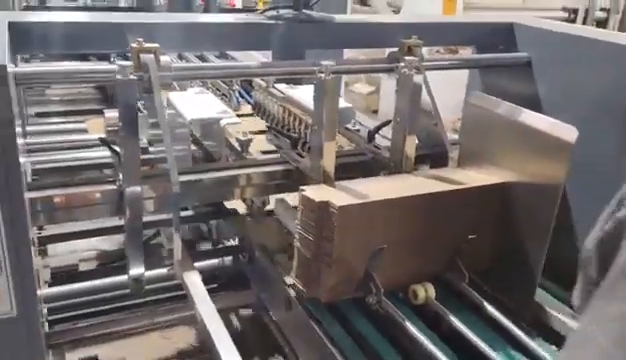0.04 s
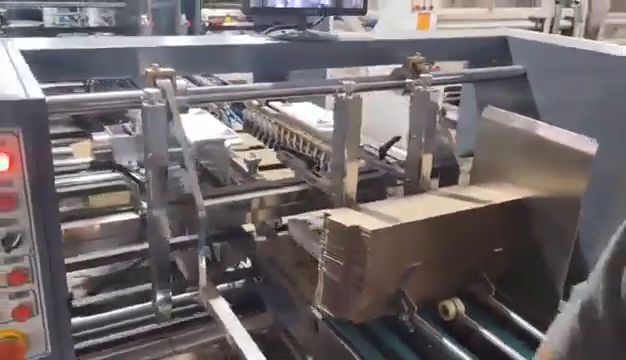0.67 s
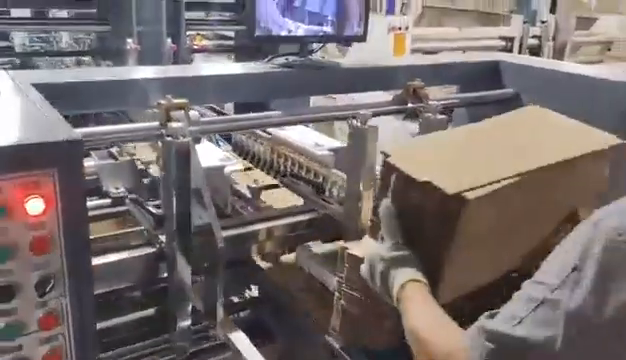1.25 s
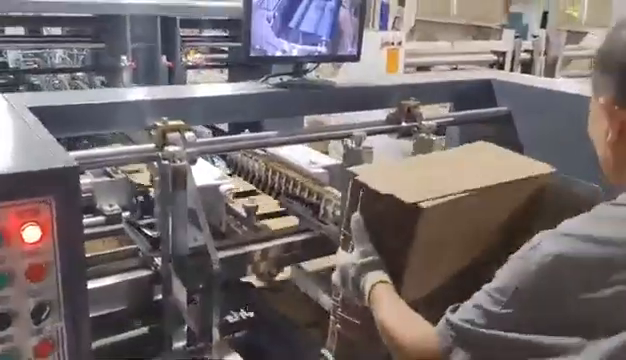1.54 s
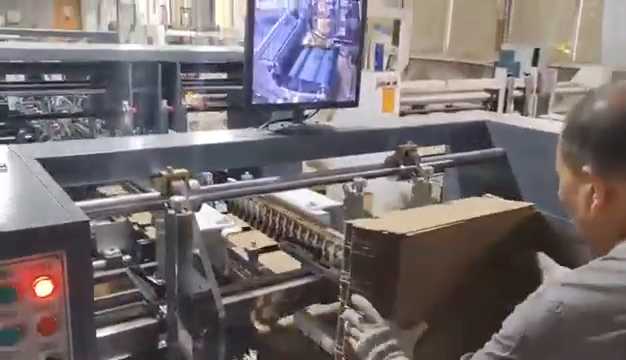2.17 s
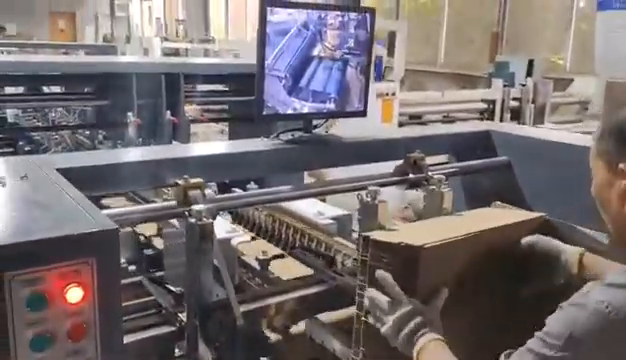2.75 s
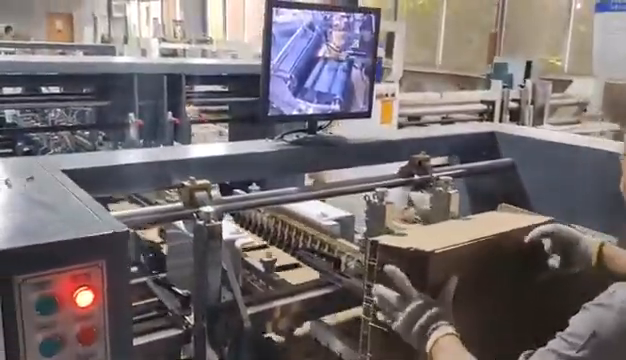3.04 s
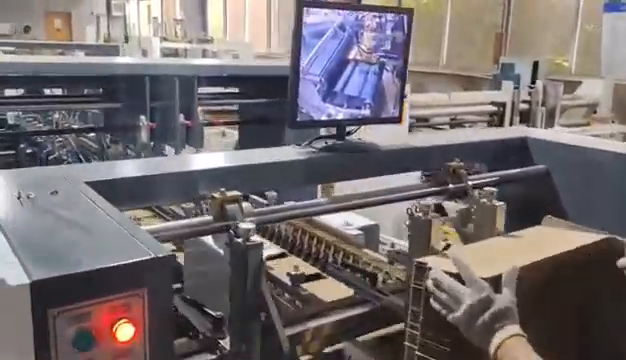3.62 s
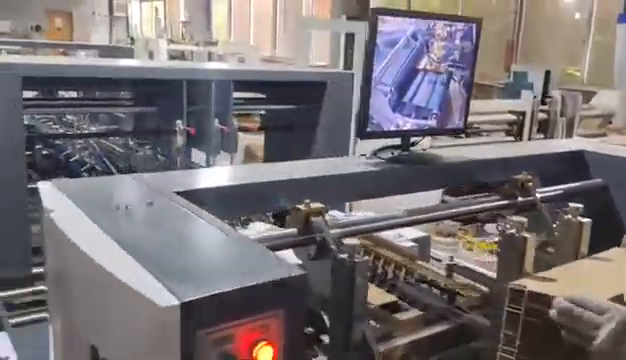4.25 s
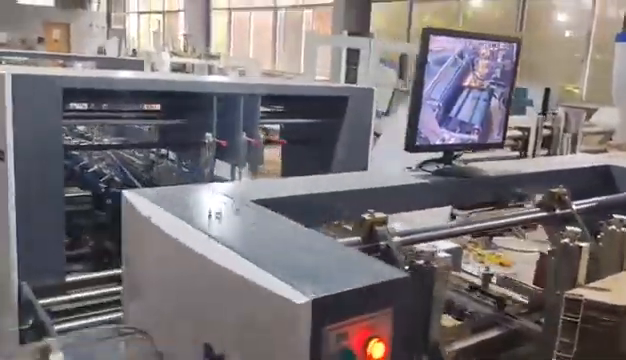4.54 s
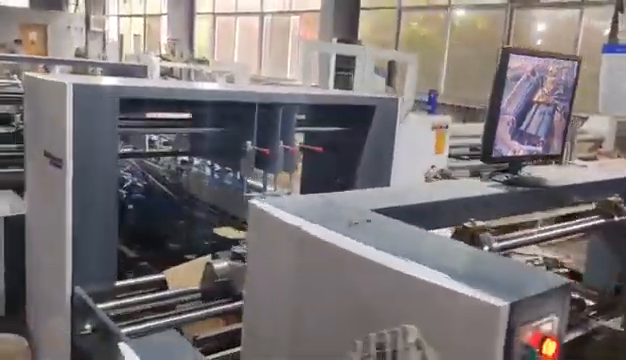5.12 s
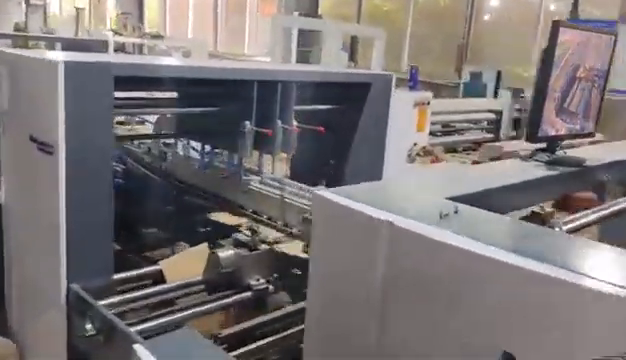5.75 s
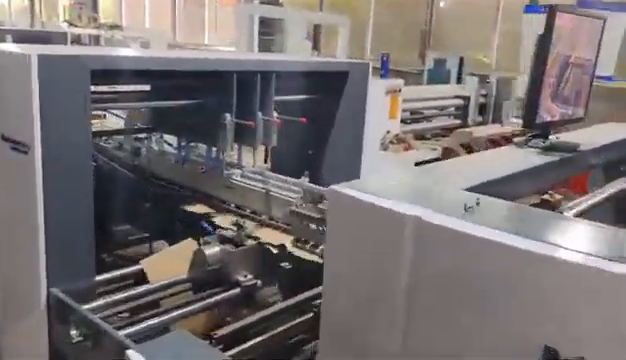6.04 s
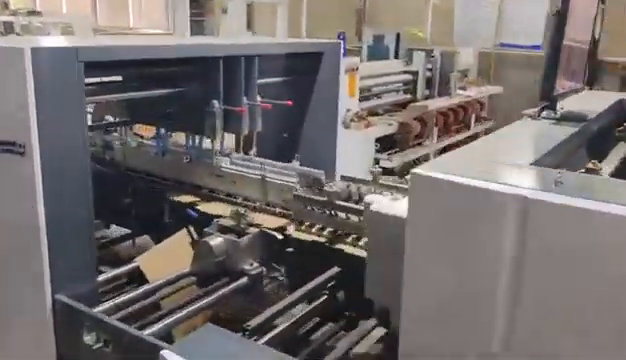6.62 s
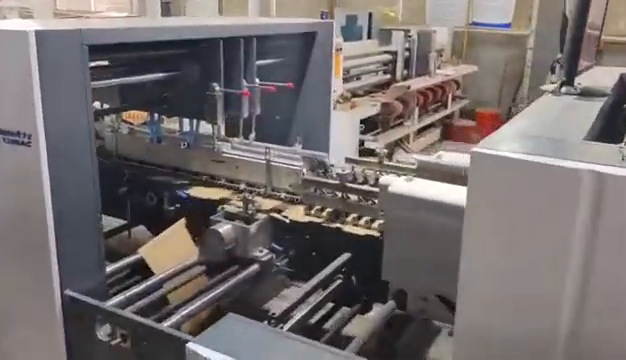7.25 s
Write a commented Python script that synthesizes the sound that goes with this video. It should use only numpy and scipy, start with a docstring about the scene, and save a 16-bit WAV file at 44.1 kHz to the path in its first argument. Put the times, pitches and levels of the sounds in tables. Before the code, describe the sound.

A factory machine feeds cardboard with a rhythmic rasp and clack over a throbbing drone, belt hiss and faint motor whine.

```python
"""A factory hall, one microphone carried from the feeder of a box folding and gluing machine along its frame.
Close by at first, a cardboard blank rasps out from under the stack about five times a second and clacks
into the rollers; card flicks at the gate and squeaks on the guides, with a faint echo off the walls.
Behind it shafts drone and throb through the steel frame, rollers rattle, belts hiss, the drive motor
whines and bearings sing. The rasp and the hiss fall back as the walk goes on."""
import sys
import numpy as np
from scipy import signal
from scipy.fft import rfft, irfft
from scipy.io import wavfile

SR = 44100
rng = np.random.default_rng(int(sys.argv[2]) if len(sys.argv) > 2 else 0)


def dump_mix(stems):
    """Bounce the given channels to the path in sys.argv[1] as a 16-bit WAV at rate SR."""
    frames = np.atleast_2d(stems).T  # one column per channel
    limited = np.clip(frames, -1, 1)  # hard clip at full scale
    pcm = np.round(limited * 32767).astype(np.int16)
    wavfile.write(sys.argv[1], SR, pcm)


N = 321489

# The blanks leaving the feeder. Each row: hit on the rollers in seconds, seconds by which the slide
# peaks earlier, slide length in seconds, relative levels in dB of rasp, edge hiss, snap and knock,
# knock pitch in Hz, relative thump level in dB.
BLANKS = [(0.09, 0.0073, 0.02, -28.5, -36, -28.5, -47, 1150, -21),
          (0.295, 0.038, 0.07, -28, -31.5, -23, -31, 1150, -40),
          (0.486, 0.025, 0.082, -31.5, -32.5, -29.5, -40, 955, -15),
          (0.664, .027, 0.059, -29, -31.5, -26, -29, 1060, -14),
          (0.859, 0.015, 0.038, -31, -36.5, -29, -29.5, 1105, -22),
          (1.065, 0.049, 0.09, -35.5, -42, -32, -34.5, 1180, -22),
          (1.251, 0.034, 0.074, -36, -39, -34, -38, 1040, -31),
          (1.442, 0.018, 0.053, -39, -39, -30.5, -34, 1180, -19),
          (1.641, 0.015, 0.033, -35.5, -39.5, -44, -32, 1040, -18),
          (1.82, 0.036, 0.051, -36, -40, -34.5, -52, 1040, -13.5),
          (2.004, 0.021, 0.046, -33.5, -35.5, -44, -44, 1050, -22),
          (2.186, 0.025, 0.022, -32, -35.5, -37, -34, 1156, -20),
          (2.374, 0.015, 0.043, -42, -42, -31, -33.5, 1035, -24),
          (2.564, 0.011, .035, -36.5, -51, -28.5, -37, 1120, -19),
          (2.752, 0.02, 0.078, -36, -40, -35, -38, 1060, -20),
          (2.937, 0.016, 0.046, -40, -56, -30.5, -36, 1060, -20),
          (3.127, 0.034, 0.047, -31.5, -37.5, -32, -42, 1130, -38),
          (3.319, 0.017, 0.039, -38, -37.5, -31.5, -38, 1080, -40),
          (3.513, 0.0073, 0.036, -35, -42, -34, -38, 1100, -23),
          (3.7, 0.03, 0.05, -37, -39, -40, -34.5, 1140, -25),
          (3.911, 0.02, 0.031, -39, -35, -34, -34, 1230, -17),
          (4.1, 0.021, 0.085, -42, -42, -42, -30.5, 1180, -24),
          (4.29, 0.023, 0.091, -42, -40.5, -33, -30.5, 1180, -17.5),
          (4.478, .012, 0.043, -56, -41, -37, -32, 1150, -32),
          (4.672, 0.009, 0.026, -50, -53, -42, -30, 1010, -45),
          (4.864, 0.013, 0.059, -46, -43, -35, -25, 1013, -28),
          (5.06, 0.031, 0.067, -46, -42.5, -30.5, -33, 1034, -41),
          (5.252, 0.033, 0.047, -49, -46, -63, -28, 1066, -23),
          (5.44, 0.0089, 0.051, -47, -46, -61, -27.5, 1070, -17),
          (5.628, 0.016, 0.05, -61, -50, -42, -32, 995, -35),
          (5.819, 0.014, 0.069, -52, -43.5, -41, -32, 1000, -36),
          (6.012, 0.017, 0.038, -52, -49, -41, -34.5, 1024, -36),
          (6.21, 0.011, 0.062, -55, -48.5, -39, -34, 1024, -37),
          (6.397, 0.012, 0.041, -47, -47, -44, -34.5, 1080, -16.5),
          (6.596, 0.0083, .04, -51, -45, -40, -36, 1010, -31),
          (6.786, 0.015, 0.057, -43, -52, -40, -34, 1025, -34),
          (6.966, 0.012, .04, -55, -47, -46, -44, 1040, -42),
          (7.166, .02, .05, -58, -60, -43, -44, 1030, -36)]


def slides():
    """Each blank sticks and slips: its fibres hiss and ring the gate, and each catch ticks in both."""
    # The gate's resonances. Each row: pitch in Hz, width in Hz, relative level in dB.
    gate_modes = [(1660, 500, -9), (3107, 150, 11.5), (3320, 110, 7.5), (3700, 200, 7.5), (4050, 320, 7),
                  (4740, 920, 9)]
    # The edge's hiss, with a dip near 9.8 kHz that is not the card's own.
    # Each row: frequency in Hz, relative level in dB.
    edge_spectrum = [(3500, -18), (5300, 3.5), (6300, 0), (7600, 7.5), (8800, 3), (9800, -8), (11800, 2.5)]
    rasps, edges, t = np.zeros(N), np.zeros(N), np.arange(-SR // 10, SR // 10) / SR
    catch_s = .001
    for s, lead, length, rasp_db, edge_db, *_ in BLANKS:
        snags = np.abs(grains(per_s=380, spread_db=2, size=len(t)))
        catches = signal.lfilter([1], [1, -np.exp(-1 / (catch_s * SR))], snags)
        slips = grains(per_s=7000, spread_db=3, size=len(t)) * (.7 + catches)
        tension = 1 + .012 * rng.standard_normal()
        rasp = sum((-1) ** k * from_db(db + rng.standard_normal()) * resonate(slips, hz * tension, width)
                   for k, (hz, width, db) in enumerate(gate_modes))
        start, envelope = s - lead + t[0], swell(t, length)
        add(rasps, start, from_db(rasp_db - 1) * burst(rasp, envelope))
        add(edges, start, from_db(edge_db + .9) * burst(slips, envelope))
    return rasps + np.std(edges) * colour(edges, edge_spectrum)


def clacks():
    """Each blank slaps into the rollers: a dry snap, a hollow knock and a thump through the frame."""
    # The ring of snap and thump. Each row: pitch in Hz, relative level in dB, t60 in seconds.
    snap_modes = [(548, 8, 0.021), (930, 17.5, 0.019), (1346, 8, 0.031), (1605, 10, 0.023),
                  (1924, 10, 0.023), (2150, 3.5, 0.013), (2563, 10, 0.025), (3200, 6, 0.018),
                  (4080, 12.5, 0.0047), (6500, -10, .004)]
    thump_modes = [(106, -9, 0.049), (176, -3, 0.054), (270, -6.5, 0.034)]
    # The knock's ring. Each row: multiple of its pitch, relative level in dB, t60 in seconds.
    knock_ratios = [(.74, 4, 0.05), (.97, 16, 0.035), (1.08, 6, 0.11)]
    out = np.zeros(N)
    for s, *_, snap_db, knock_db, knock_hz, thump_db in BLANKS:
        knock_modes = [(ratio * knock_hz, db, t60) for ratio, db, t60 in knock_ratios]
        snap = strike(snap_modes, detune=.06, crunch=5, crunch_s=.006)
        knock = strike(knock_modes, detune=.015, crunch=1.5, crunch_s=.005)
        thump = strike(thump_modes, detune=.04, crunch=.3, crunch_s=.004)
        add(out, s - .003, from_db(snap_db) * snap)
        add(out, s - .002, from_db(knock_db - 1) * knock)
        add(out, s - .003, from_db(thump_db - 4.5) * thump)
    return out


def flicks():
    """Now and then a stiff card edge lets go of the gate with a dry, bright crackle."""
    # The flicks. Each row: start in seconds, level in dB.
    releases = [(0.08, -26.5), (0.654, -28), (0.848, -25.5), (1.426, -32), (1.636, -38), (1.987, -37),
                (2.743, -36), (3.115, -33), (3.311, -33), (4.274, -34), (4.476, -37), (4.852, -31.5),
                (5.431, -36.5), (5.807, -36), (6.971, -38)]
    # Their crackle. Each row: frequency in Hz, relative level in dB.
    spectrum = [(3500, -2), (7000, -4), (9500, -5.5), (11800, 1)]
    out, t = np.zeros(N), np.arange(SR // 10) / SR
    decay_s = .009
    for s, db in releases:
        crackle = grains(per_s=5000, spread_db=4, size=len(t)) * np.exp(-t / decay_s)
        add(out, s, from_db(db) * rms_one(crackle) / np.sqrt(10))
    return np.std(out) * colour(out, spectrum)


def squeaks():
    """Cardboard rubs along the steel guides: a narrow resonance squeaks, a wide one scrapes."""
    # The rubs. Each row: peak time and length in seconds, pitch and width in Hz, level in dB.
    rubs = [(0.035, 0.037, 7600, 200, -37), (0.081, 0.024, 4140, 250, -34), (0.293, 0.017, 4000, 2500, -32),
            (0.317, 0.033, 2980, 200, -39), (0.612, 0.022, 3200, 600, -30), (0.652, 0.016, 3770, 700, -30),
            (0.7, 0.021, 2160, 120, -40), (0.706, 0.019, 6640, 2500, -36.5),
            (0.786, 0.016, 3500, 1800, -38), (1.048, 0.02, 3270, 900, -33), (2.332, .025, 4400, 2200, -40),
            (2.87, .025, 3600, 1800, -44), (3.7, .025, 3740, 80, -44), (3.707, 0.022, 8240, 60, -41),
            (4.926, 0.22, 6400, 550, -44.5), (5.79, .03, 3200, 900, -45), (6.07, 0.011, 3200, 1200, -43),
            (6.19, .025, 2800, 900, -46), (6.635, .045, 4200, 2500, -46), (6.705, 0.021, 3100, 800, -43),
            (6.791, .05, 2980, 1200, -53), (6.88, .03, 4300, 900, -49), (6.96, .03, 3300, 1800, -54),
            (7.262, .04, 3620, 1500, -45)]
    out, t = np.zeros(N), np.arange(-SR // 4, SR // 4) / SR
    for s, length, hz, width, db in rubs:
        add(out, s + t[0], from_db(db) * burst(noise_band(hz, width, len(t)), swell(t, length)))
    return out


def stack():
    """A fresh stack of cardboard bumps against the feeder's stops."""
    # Its dull ring. Each row: pitch in Hz, relative level in dB, t60 in seconds.
    modes = [(350, 6, 0.12), (428, -1, 0.058)]
    out = np.zeros(N)
    add(out, s=2.748, sound=from_db(-25) * strike(modes, detune=.01, crunch=.5, crunch_s=.006))
    return out


def drone(level_db):
    """Turning shafts shake the frame, which booms at its resonances over a broad rumble."""
    # The frame's resonances. Each row: pitch in Hz, width in Hz, relative level in dB.
    frame_modes = [(58.3, 30, -7.5), (98.2, 13, -2), (118.7, 13, -4), (183, 41, -5), (246.3, 13.6, -6),
                   (270.2, 43, -3), (336, 19, -9.5)]
    # The rumble. Each row: frequency in Hz, relative level in dB.
    rumble_spectrum = [(25, -28), (40, -30), (55, 0), (80, -4.5), (150, 1.5), (210, -3), (280, -1),
                       (370, -10.5), (460, -16), (800, -29)]
    boom = sum(from_db(db) * resonate(rng.standard_normal(N), hz, width) for hz, width, db in frame_modes)
    boom = rms_one(signal.sosfilt(signal.butter(2, 380, fs=SR, output="sos"), boom))
    shake = from_db(-5) * boom + from_db(-6) * colour(rng.standard_normal(N), rumble_spectrum)
    # The deepest part fills the hall, equally loud wherever the microphone is.
    deep = signal.sosfiltfilt(signal.butter(4, 135, fs=SR, output="sos"), shake)
    return from_db(-26.5) * deep + from_db(level_db) * (shake - deep)


def shaft():
    """A low hum swells and fades six times a second, so the drone throbs."""
    # The hum along the walk. Each row: time in seconds, level at the crest in dB.
    levels = [(0, -27), (0.6, -30), (1.2, -31.5), (2.6, -34.5), (3.3, -32), (3.9, -33), (4.6, -31.5),
              (5.7, -28.5), (6.6, -38.5), (7.29, -29.5)]
    hum_db, = in_time(levels)
    hum_hz, throbs_per_s, depth = 174, 6.08, .86
    swing = np.abs(np.cos(np.pi * throbs_per_s * np.arange(N) / SR + .15 * drift(3))) ** 1.6
    hum = sine(hum_hz + 4 * drift(6))
    return from_db(hum_db + .7 * drift(5.1)) * (1 - depth + depth * swing) * hum


def booms():
    """Now and then a panel of the frame swells into a short boom."""
    # The booms. Each row: peak time in seconds, pitch in Hz, level in dB.
    panels = [(0.086, 270, -25), (0.481, 177.7, -23), (2.551, 247.6, -30.5), (4.308, 268, -28),
              (5.131, 243, -26), (6.901, 268, -26.5)]
    out, t = np.zeros(N), np.arange(-SR // 5, SR // 5) / SR
    for s, hz, db in panels:
        add(out, s + t[0], from_db(db) * swell(t, length=.039) * sine(np.full(len(t), hz)))
    return out


def rollers(level_db):
    """The rollers rattle with dense small knocks."""
    # The rattle. Each row: frequency in Hz, relative level in dB.
    spectrum = [(300, -6), (480, -3), (580, 2.5), (680, 7.5), (800, 5), (900, 5), (1020, 2), (1250, -2),
                (1600, -9), (2400, -10), (3200, -28), (5000, -56)]
    return from_db(level_db + .7 * drift(31)) * colour(grains(per_s=5000, spread_db=1), spectrum)


def belts(level_db):
    """Belts hiss and their guides jingle lightly; a narrow band of the high treble is missing."""
    # The belts' hiss, with a hole near 9.7 kHz that is not the belts' own.
    # Each row: frequency in Hz, relative level in dB.
    spectrum = [(900, 8.5), (1800, 9), (3100, 6.5), (4200, 4.5), (5200, 4), (6200, 7), (7000, 6),
                (7700, 5.5), (8700, 5), (9700, -20), (10700, -4.5), (11800, 0)]
    # The guides' resonances. Each row: pitch in Hz, width in Hz, relative level in dB.
    guide_modes = [(2840, 350, -8.5), (3360, 180, -17), (4100, 72, -19), (5870, 110, -13),
                   (7540, 130, -18.5), (11600, 140, -21)]
    rub = flutter(colour(grains(per_s=16000, spread_db=0), spectrum), depth_db=2.5, rate=40)
    hiss = from_db(1.08 * drift(29)) * rub
    jingle = sum(from_db(db + 2.5 * drift(20)) * resonate(grains(per_s=400, spread_db=2), hz, width)
                 for hz, width, db in guide_modes)
    return from_db(level_db) * (hiss + from_db(-3) * jingle)


def motor():
    """The whine sways in pitch with the load of the blanks, and its reflections make it flutter."""
    # The whine beams unevenly along the machine. Each row: time in seconds, level in dB.
    levels = [(0, -54), (0.05, -54), (0.08, -44), (0.17, -42), (0.27, -61), (0.36, -42), (0.43, -46),
              (0.66, -54), (0.73, -42), (0.79, -46), (0.95, -46), (1.04, -46), (1.08, -53), (1.16, -43.5),
              (1.3, -46.5), (1.47, -49), (1.55, -45), (1.8, -46), (1.94, -39), (2.05, -47), (2.15, -40),
              (2.22, -45.5), (2.33, -39), (2.42, -44.5), (2.52, -38.5), (2.64, -47), (2.87, -47.5),
              (3.08, -46.5), (3.52, -43), (3.58, -52), (3.63, -40), (3.78, -44), (3.92, -37.5), (4.05, -43),
              (4.18, -39), (4.26, -40.5), (4.45, -42), (4.62, -47), (4.75, -47.5), (5.02, -50.5),
              (5.15, -43), (5.22, -48), (5.3, -45.5), (5.46, -42), (5.56, -55), (5.7, -45.5), (5.98, -68),
              (6.2, -50), (6.75, -51), (6.85, -55), (7.29, -52)]
    whine_db, = in_time(levels)
    whine_hz, blanks_per_s = 2499, 5.25
    load = np.sin(2 * np.pi * blanks_per_s * np.arange(N) / SR)
    direct = sine(whine_hz + 3 * load + 1.08 * drift(16))
    scattered = .3 * noise_band(whine_hz, width=50)
    return from_db(whine_db + 1.2 * drift(24)) * (direct + scattered)


def bearings():
    """Shafts and bearings sing faintly; one wavering bearing grows as the microphone passes it."""
    # The faint tones. Each row: pitch in Hz, level in dB.
    tones = [(501, -57), (7503, -58.5), (8040, -68)]
    # The near bearing along the walk. Each row: time in seconds, level in dB.
    levels = [(0, -45.5), (3.5, -47.5), (4.4, -41.5), (5.3, -51), (6, -41), (6.4, -59), (7.29, -58)]
    near_db, = in_time(levels)
    faint = sum(from_db(db + 1.8 * drift(13)) * sine(hz + 6 * drift(21.5)) for hz, db in tones)
    return faint + from_db(near_db) * noise_band(hz=792, width=38)


def hall(x):
    """Diffuse, dulled reflections come back from the walls and the other machines."""
    t = np.arange(SR) / SR
    t60_s, delay_s = .45, .008
    tail = rng.standard_normal(SR) * from_db(-60 * t / t60_s) * (t > delay_s)
    tail = signal.sosfilt(signal.butter(1, 5000, fs=SR, output="sos"), tail)
    return signal.fftconvolve(x, rms_one(tail) / np.sqrt(SR))[:N]


def strike(modes, detune, crunch, crunch_s):
    """A sharp contact and a brief crunch of fibres ring the modes; the energy of 10 ms at rms 1."""
    t = np.arange(SR // 10) / SR
    hz, db, t60 = np.transpose(modes)[:, :, None]
    level_scatter, pitch_scatter = rng.standard_normal((2, len(modes), 1))
    decays = from_db(db + 2 * level_scatter - 60 * t / t60)
    ring = np.sum(decays * np.sin(2 * np.pi * hz * (1 + detune * pitch_scatter) * t), axis=0)
    # A struck part radiates little outside the range of its modes.
    band = signal.butter(2, [.85 * hz.min(), 1.12 * hz.max()], "band", fs=SR, output="sos")
    ring = signal.sosfilt(band, ring)
    contact = crunch * rms_one(rng.standard_normal(len(t)) * np.exp(-t / crunch_s)) / np.sqrt(len(t))
    contact[0] += 1
    return rms_one(signal.fftconvolve(contact, ring)[:len(t)]) / np.sqrt(10)


def grains(per_s, spread_db, size=N):
    """Tiny contacts at random moments, of uneven size."""
    contacts = (rng.random(size) < per_s / SR) * rng.choice([-1, 1], size)
    return contacts * from_db(spread_db * np.clip(rng.standard_normal(size), -2, 2))


def resonate(x, hz, width):
    """Ring one resonance with x; rms 1."""
    r = np.exp(-np.pi * width / SR)
    return rms_one(signal.lfilter([1, 0, -1], [1, -2 * r * np.cos(2 * np.pi * hz / SR), r * r], x))


def noise_band(hz, width, size=N):
    """Noise passed twice through a resonance; rms 1."""
    return resonate(resonate(rng.standard_normal(size), hz, width), hz, width)


def sine(hz):
    """A tone of rms 1 that follows a pitch curve."""
    return np.sqrt(2) * np.sin(2 * np.pi * np.cumsum(hz) / SR)


def colour(x, spectrum):
    """Give x a spectrum that falls away beyond both ends; rms 1."""
    hz = np.arange(N // 2 + 1) * SR / N + 1e-3
    at, db = np.transpose(spectrum)
    skirts = np.minimum(1, hz / at[0]) ** 2 * np.minimum(1, at[-1] / hz) ** 2
    return rms_one(irfft(rfft(x) * skirts * from_db(np.interp(np.log(hz), np.log(at), db)), N))


def flutter(x, depth_db, rate):
    """Each half octave of the treble swells and fades on its own."""
    octave = np.log2(np.maximum(np.arange(N // 2 + 1) * SR / N, 1))
    spectrum, centres = rfft(x), np.linspace(np.log2(1500), np.log2(12000), num=7)
    bands = (irfft(spectrum * np.interp(octave, centres, share), N) for share in np.eye(len(centres)))
    return sum(band * from_db(depth_db * drift(rate)) for band in bands)


def drift(rate):
    """A random wander, mostly slower than rate in Hz; rms 1."""
    hz = np.arange(N // 2 + 1) * SR / N
    return rms_one(irfft(rfft(rng.standard_normal(N)) / (1 + (hz / rate) ** 2) ** 2, N))


def swell(t, length):
    """A smooth rise and fall around t = 0."""
    return np.exp(-np.abs(2 * t / length) ** 3 / 2)


def burst(x, envelope):
    """Shape x by an envelope; its power is that of the envelope itself."""
    return rms_one(x * envelope) * np.sqrt(np.mean(envelope ** 2))


def in_time(rows):
    """Each column of a curve at every sample."""
    s, *columns = np.transpose(rows)
    return [np.interp(np.arange(N) / SR, s, c) for c in columns]


def add(out, s, sound):
    """Mix a sound in at s seconds."""
    at = round(s * SR) + np.arange(len(sound))
    inside = (at >= 0) & (at < N)
    out[at[inside]] += sound[inside]


def from_db(db):
    return 10 ** (np.asarray(db) / 20)


def rms_one(x):
    return x / np.sqrt(np.mean(x ** 2) + 1e-20)


def scene():
    """The feeder stands out of the running machine and echoes faintly in the hall."""
    # The machine, further off as the walk goes on. Each row: time in seconds, then relative
    # levels in dB of frame drone, roller rattle and belt hiss.
    walk = [(0.0, -24.5, -33.5, -33.5), (0.45, -23, -31.5, -37.5), (0.67, -27, -35, -39.5),
            (0.99, -26.5, -36, -41), (4.95, -27.5, -37.5, -40), (5.18, -29, -37.5, -44),
            (6.62, -26.5, -39, -44.5), (6.82, -27.5, -38, -43.5), (7.29, -27.5, -38, -44)]
    drone_db, rattle_db, hiss_db = in_time(walk)
    feeder = slides() + flicks() + squeaks() + clacks() + stack()
    frame = drone(drone_db + 2.2) + shaft() + booms()
    drive = rollers(rattle_db - .9) + belts(hiss_db + 1.5) + motor() + bearings()
    return (feeder + frame + drive + from_db(-16) * hall(feeder))[None]


def record(dry):
    """The microphone sheds the deepest bass, and the top is cut steeply at 12 kHz."""
    thinned = signal.sosfilt(signal.butter(4, 38, "high", fs=SR, output="sos"), dry)
    return signal.sosfilt(signal.ellip(12, .2, 80, 12000, fs=SR, output="sos"), thinned)


dry = scene()
out = record(dry)
dump_mix(out)
```